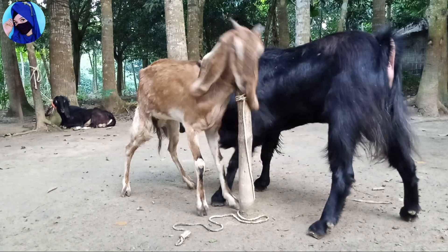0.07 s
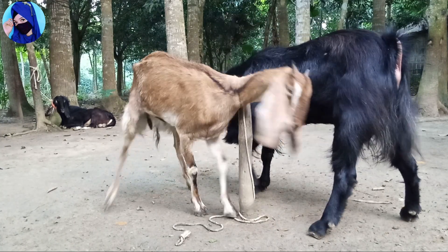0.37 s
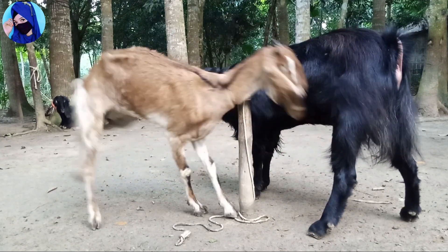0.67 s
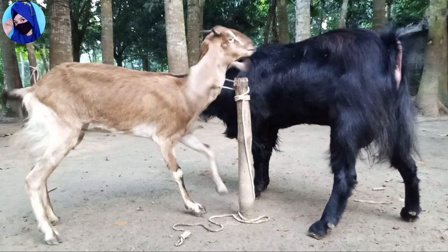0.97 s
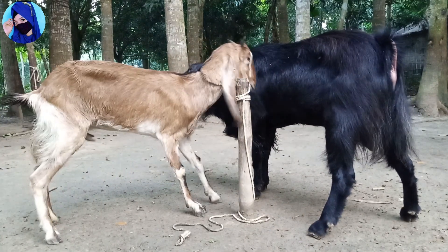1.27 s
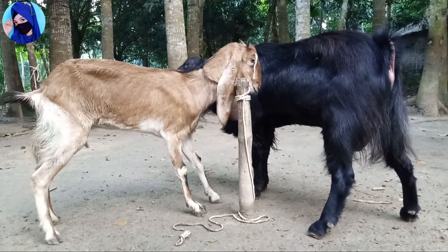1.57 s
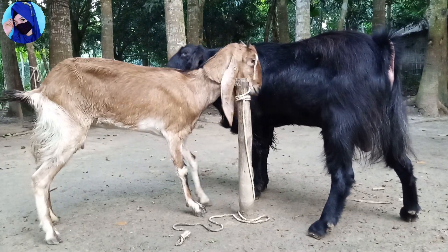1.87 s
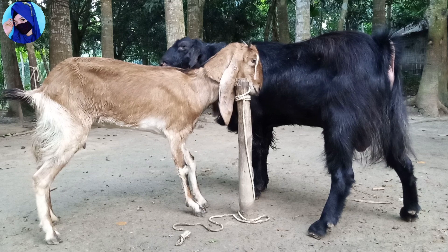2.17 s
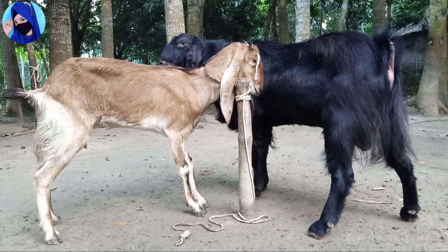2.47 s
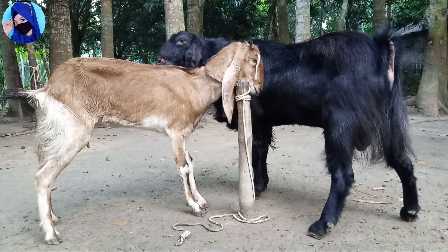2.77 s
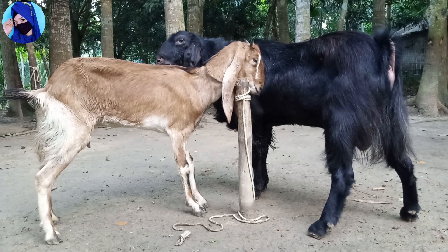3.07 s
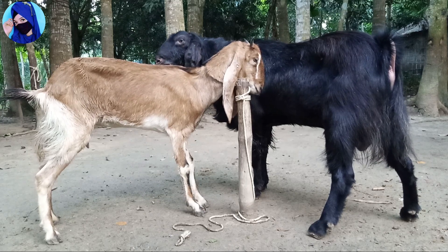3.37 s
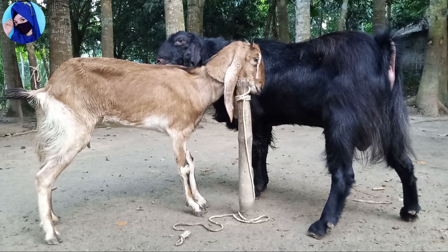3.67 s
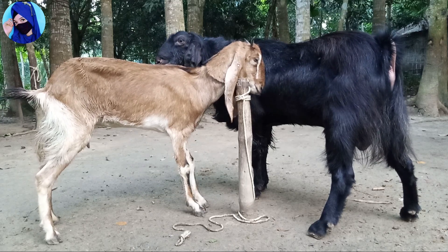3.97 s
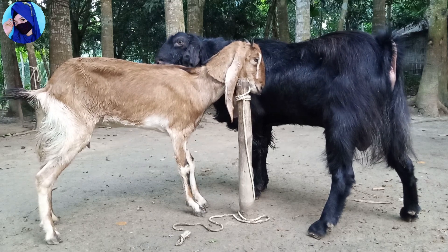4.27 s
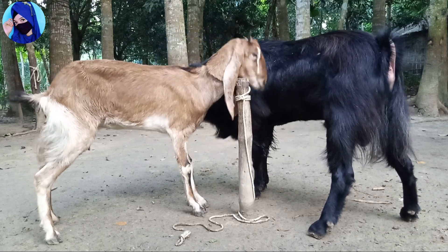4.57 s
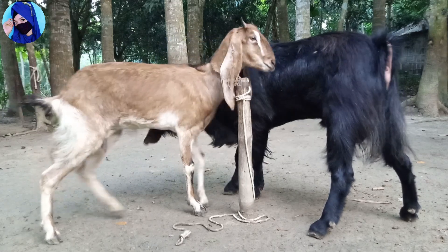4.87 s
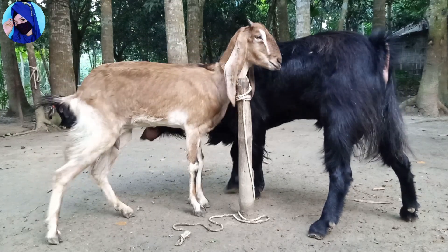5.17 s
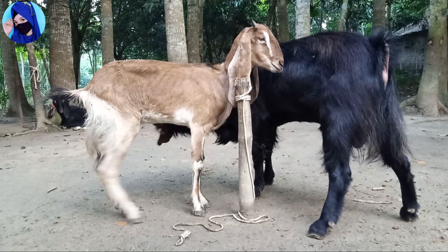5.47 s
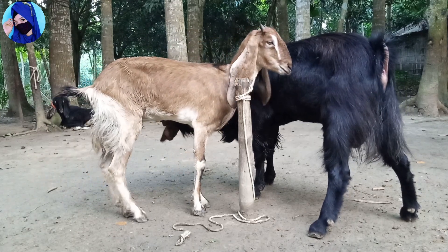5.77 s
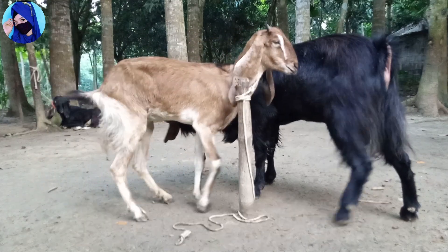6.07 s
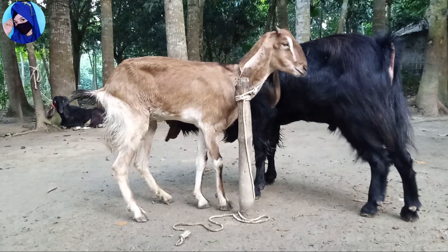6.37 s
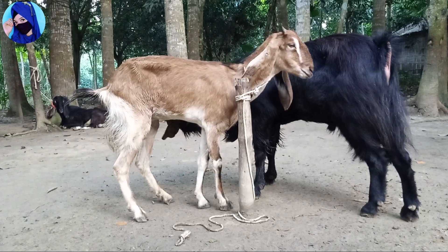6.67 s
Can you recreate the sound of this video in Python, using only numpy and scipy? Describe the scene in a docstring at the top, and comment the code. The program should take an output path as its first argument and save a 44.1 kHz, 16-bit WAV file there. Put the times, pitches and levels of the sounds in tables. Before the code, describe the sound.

Close by in a quiet outdoor yard, a goat snorts and hooves knock and scuff on packed earth. After three quick snorts and a brief closed-mouth hum, the goat stutters a bleat in five short bursts with wet lip noises, ending on a soft puff of air. Small birds whistle faintly throughout, with distant clucks, a thin insect tone, dry rustling and a low rumble.

```python
"""Two tethered goats in a yard among trees.

The buck snorts through his nostrils, hums once with closed mouth, then stutters a bleat: five short
bursts of glottal pulses through the mouth, with wet lip noises and a last puff of air. Hooves knock and
scuff on packed earth. Small birds whistle in the grove, far animals cluck and call, and insects keep up
a thin high tone over a low rumble and a dry rustle."""
import sys
import numpy as np
from scipy import signal
from scipy.fft import rfft, irfft, next_fast_len
from scipy.io import wavfile
from scipy.ndimage import uniform_filter1d, map_coordinates

SR = 44100
rng = np.random.default_rng(int(sys.argv[2]) if len(sys.argv) > 2 else 0)


def dump(signal):
    """Clip the signal to [-1, 1] and save it as 16-bit WAV at the path in sys.argv[1]."""
    limited = np.clip(np.atleast_2d(signal).T, -1, 1)
    pcm = np.round(limited * 32767).astype(np.int16)
    wavfile.write(sys.argv[1], SR, pcm)


N = 304731


def bleat(jitter=0.077, shimmer_db=5, alternate_db=4, muffle_hz=1500):
    """Hum, then five bursts: glottal pulses and air ring the vocal tract over a round chest tone."""
    # Each row: start in s, length in s, first, middle and last pitch in Hz, chest level in dB, final
    # mouth level in dB, swell in dB, attack in s, jaw and tongue resonances in Hz, roughness 0-1.
    bursts = [(3.841, 0.0737, 200, 189.5, 178, -35.5, -89, 6, 0.039, 400, 900, 0.2),
              (4.527, 0.045, 212.3, 211, 193.4, -31, -31.5, 4, 0.02, 383, 1118, 0.3),
              (4.651, 0.043, 222.2, 200.2, 213, -27.5, -25.5, -1.5, 0.007, 539, 1016, 0.72),
              (4.767, .043, 222.6, 201.8, 203.3, -27, -24, 1, 0.0053, 543, 983, 0.32),
              (4.887, .046, 205, 182.3, 232.5, -25.5, -23.5, 4.5, 0.014, 638, 927, 0.8),
              (5.003, 0.053, 204.5, 188.4, 204.3, -27.5, -19.5, 12, 0.016, 564, 916, 0.37)]
    # Upper resonances. Each row: centre in Hz, width in Hz, gain in dB.
    throat_modes = [(1426, 340, -15), (2567, 200, -23.5), (3230, 460, -17), (3550, 250, -27),
                    (5720, 150, -20.5), (6660, 380, -23.5)]
    # Nose resonance: centre in Hz, width in Hz, gain in dB.
    nasal_mode = (405, 150, -8)
    out, t = np.zeros(N), np.arange(SR // 8) / SR
    for (start_s, length_s, first_hz, middle_hz, last_hz, chest_db, mouth_db, swell_db,
         attack_s, jaw_hz, tongue_hz, rough) in bursts:
        progress = np.clip(t / length_s, 0, 1)
        pitch_hz = glide(first_hz, middle_hz, last_hz, progress)
        pitch_hz *= 1 + jitter * rough * wobble(200, size=len(t))
        phase = 2 * np.pi * np.cumsum(pitch_hz) / SR
        pulses = unit(np.cos(np.arange(1, 44)[:, None] * phase).sum(0))
        # Rough folds flap unevenly, strong and weak pulses in turn.
        pulses *= amp(rough * (shimmer_db * wobble(215, size=len(t)) + alternate_db * np.cos(phase / 2)))
        air = unit(rng.standard_normal(len(t)) * (1 + .5 * np.cos(phase)))  # one hiss per cycle
        voiced = gate(t, length_s, rise=attack_s, fall=0.0073)
        push = voiced * amp(swell_db * (progress - 1))  # the mouth opens
        vowel_modes = [nasal_mode, (jaw_hz, 230, 0), (tongue_hz, 250, 1)]
        # Nearly shut lips muffle the vowel.
        mouth = filtered((pulses + rough * air) * push,
                         lambda hz: vocal_tract(vowel_modes, hz) / (1 + (hz / muffle_hz) ** 10))
        mouth += filtered((.5 * pulses + air) * push, lambda hz: vocal_tract(throat_modes, hz))
        mouth *= np.std(push) / np.std(mouth)
        chest = voiced * unit(np.sin(phase))
        add(out, start_s, amp(mouth_db) * mouth + amp(chest_db) * chest)
    return out


def vocal_tract(modes, hz):
    """Response of steep resonances in parallel."""
    return sum(amp(db) * resonance(hz, centre_hz, width_hz) ** 2 for centre_hz, width_hz, db in modes)


def lips(rise_s=0.00095):
    """Lips and tongue part with short wet splutters."""
    # Each row: start in s, level in dB, T60 in s.
    smacks = [(4.443, -46.5, 0.06), (4.462, -41, 0.062), (4.612, -42.5, 0.031), (4.668, -40.5, 0.044),
              (4.688, -39, 0.024), (4.768, -37, 0.04), (4.803, -35, 0.02), (4.886, -39.5, 0.046),
              (4.898, -37, 0.051), (4.925, -29, 0.041), (5.050, -23.5, 0.034)]
    # Each row: frequency in Hz, level in dB.
    spectrum = [(300, -16.5), (1100, 5.5), (2100, -10.5), (3200, 2.5), (4400, -10.5), (5200, -3.5),
                (6800, -0.5), (7600, -19), (8600, -3), (12000, -16), (16000, -31)]
    out, t = np.zeros(N), np.arange(SR // 10) / SR
    for start_s, db, t60_s in smacks:
        envelope = amp(db - 60 * t / t60_s) * (1 - np.exp(-t / rise_s))
        add(out, start_s, envelope * noise(spectrum, size=len(t)))
    return out


def snorts(flutter_db=1, click_t60_s=0.017):
    """Air bursts through the nostrils with a click, holds briefly and dies away."""
    # Each row: start in s, level in dB, rise, hold and T60 in s, low cut in Hz, relative click in dB.
    blasts = [(.110, -43, 0.0023, 0.027, 0.46, 3740, 7), (0.43, -47, .01, 0.014, 0.32, 3620, -15),
              (0.454, -36.5, .005, .06, 0.44, 3760, 6.5), (1.396, -57, 0.0093, 0.079, 0.38, 8560, -20),
              (3.177, -42, 0.0027, .06, 0.6, 5840, 8), (3.246, -38.5, .004, 0.046, 0.46, 2120, 12),
              (3.317, -33.5, 0.0023, 0.033, 0.51, 2500, 7.5), (3.974, -49, 0.017, 0.066, 0.36, 5150, -14.5)]
    # Each row: frequency in Hz, level in dB.
    spectrum = [(590, -64), (1000, -6), (1190, -14), (1500, -9), (1740, -13), (2400, -4), (3760, -4.5),
                (4080, -2), (4520, -5), (5960, 1.5), (8050, -4), (9350, 0), (13500, -15), (14800, -6),
                (15700, -6)]
    out, t = np.zeros(N), np.arange(SR // 2) / SR
    for start_s, db, rise_s, hold_s, t60_s, cut_hz, click_db in blasts:
        hiss = noise(spectrum, size=len(t))
        jet = unit(filtered(hiss, lambda hz: hz ** 2 / np.hypot(hz ** 2, cut_hz ** 2)))
        decay_db = -60 * np.maximum(t - hold_s, 0) / t60_s
        flow = amp(decay_db + flutter_db * wobble(130, size=len(t))) * (1 - np.exp(-t / rise_s))
        click = amp(click_db - 60 * t / click_t60_s)
        add(out, start_s, amp(db) * jet * (flow + click))
    return out


def puff(start_s=5.27, length_s=0.13, db=-53.5):
    """The buck lets out the last of his air, dull and unvoiced."""
    # Each row: frequency in Hz, level in dB.
    spectrum = [(71, -15), (120, 0.5), (349, -15), (446, -10), (541, -28), (1200, -15.5), (2060, -22),
                (2600, -46), (3380, -71), (5720, -120)]
    out, t = np.zeros(N), np.arange(SR // 3) / SR
    add(out, start_s, amp(db) * gate(t, length_s, rise=.07, fall=0.047) * noise(spectrum, size=len(t)))
    return out


def knocks(tick_t60_s=0.017, tick_rise_s=0.001, thud_t60_s=0.034, thud_rise_s=0.00071, lag_s=0.00414):
    """Hoof blows and rope tugs: a hard tick, then a low thud of packed earth."""
    # Each row: start in s, tick level in dB, thud half-amplitude in dB, thud pitch in Hz.
    blows = [(0.06, -48, -50, 259), (0.86, -46, -43, 228), (0.9121, -25.5, -39, 302),
             (1.302, -37, -69, 330), (4.447, -46, -40, 242), (4.465, -55, -40, 179), (4.476, -60, -45, 265)]
    # Each row: frequency in Hz, level in dB.
    spectrum = [(240, -45), (400, 0), (949, -21), (1470, -3), (2830, -4), (5110, -2), (6610, -4.5),
                (7030, -7), (15000, -29.5)]
    out, t = np.zeros(N), np.arange(SR // 8) / SR
    for start_s, tick_db, thud_db, thud_hz in blows:
        tick = amp(tick_db - 60 * t / tick_t60_s) * (1 - np.exp(-t / tick_rise_s))
        thud = 2 * amp(thud_db - 60 * t / thud_t60_s) * (1 - np.exp(-t / thud_rise_s))
        add(out, start_s, tick * noise(spectrum, size=len(t)))
        add(out, start_s + lag_s, thud * np.sin(2 * np.pi * thud_hz * t))
    return out


def scuffs(fade_db=9):
    """A hoof dragged through dust bites, then fades as it slows."""
    # Each row: start in s, length in s, level at the end of the fade in dB.
    drags = [(1.036, 0.19, -55), (4.433, 0.099, -60.5), (5.848, 0.037, -55.5), (6.098, 0.21, -64.5)]
    # Each row: frequency in Hz, level in dB.
    spectrum = [(710, -59.5), (1200, -45), (1910, -23), (2130, -7), (2730, -6.5), (2930, -0.5),
                (4430, -0.5), (9570, -10.5), (14000, -49)]
    out, t = np.zeros(N), np.arange(SR // 3) / SR
    for start_s, length_s, db in drags:
        envelope = gate(t, length_s, rise=0.024, fall=0.11) * amp(db + fade_db * (1 - t / length_s))
        add(out, start_s, envelope * noise(spectrum, size=len(t)))
    return out


def birds(slur_s=.06, chirp_s=.04, chirp_hz=2634):
    """Small birds in the grove; each kind of note has its own arc and distance."""
    # Arching, then falling. Each row: start in s, length in s, level in dB, nominal pitch in Hz.
    whistles = [(.32, 0.1, -66.5, 4340), (.955, 0.1, -62.5, 4450), (1.45, .13, -60, 4310),
                (1.875, 0.12, -59.5, 4330), (2.29, .165, -59, 4417), (2.80, 0.16, -58.5, 4450),
                (3.12, .145, -55.5, 4510), (3.58, 0.17, -58, 4400), (4.32, .035, -54, 4485),
                (6.45, 0.2, -59.5, 2667)]
    # Downward, deeper in the grove. Each row: start in s, level in dB, nominal pitch in Hz.
    slurs = [(.70, -61.5, 3660), (1.321, -61, 3603), (1.821, -62.5, 4150), (2.165, -63, 3526),
             (2.688, -61, 3665), (2.94, -63, 3554), (3.778, -68, 4040), (4.337, -61.5, 3137),
             (5.251, -62, 4140), (5.379, -58, 3730), (5.55, -59, 3560), (5.871, -62.5, 3404),
             (6.041, -66, 3790), (6.71, -66, 3784)]
    # A second bird, two runs of arched notes. Each row: start in s, level in dB.
    chirps = [(.83, -57.5), (1.237, -56), (1.575, -57.5), (1.918, -58), (2.263, -60), (5.125, -58.5),
              (5.493, -56.5), (5.853, -54), (6.198, -55)]
    # Rising notes. Rows as in whistles.
    rises = [(5.605, 0.1108, -49.5, 3477), (5.625, .1, -49.5, 3984), (6.04, 0.046, -60.5, 2300),
             (6.86, 0.064, -62.5, 2640)]
    slur_notes = [(start_s, slur_s, db, hz) for start_s, db, hz in slurs]
    chirp_notes = [(start_s, chirp_s, db, chirp_hz) for start_s, db in chirps]
    return (calls(whistles, arc_semitones=(0.56, -3), echo_db=-3, waver=0.0056, blur=.05)
            + calls(slur_notes, arc_semitones=(2.52, -2.3), echo_db=7.5, waver=0.021, blur=.1)
            + calls(chirp_notes, arc_semitones=(-3, -3), echo_db=-3.5, waver=0.0068, blur=0.079)
            + calls(rises, arc_semitones=(-1.276, 0), echo_db=-2.5, waver=.012, blur=.06))


def far_animals(cluck_s=.018, first_hoot_s=.62, every_s=.665, hoot_s=0.308, hoot_db=-66.5, hoot_hz=783):
    """Fowl, low moans and three faint drooping hoots from beyond the yard."""
    # Short dropping notes. Each row: start in s, level in dB, nominal pitch in Hz.
    clucks = [(0.018, -62, 486), (.198, -52.5, 436), (.61, -54, 360), (.658, -50, 394), (.706, -49, 400),
              (.762, -53.5, 361), (2.73, -61.5, 634), (2.877, -48.5, 476), (3.915, -51, 356),
              (3.977, -56, 362), (4.026, -52, 384), (4.077, -50, 384), (4.366, -55, 428)]
    # Longer, flatter notes. Each row: start in s, length in s, level in dB, nominal pitch in Hz.
    squawks = [(0, 0.048, -57, 798), (.22, 0.04, -61.5, 647), (2.60, 0.019, -60.5, 868),
               (3.73, 0.041, -66.5, 863), (6.76, 0.062, -66, 1109)]
    # Sagging, then lifting. Rows as in squawks.
    moans = [(1.07, 0.284, -57, 312), (1.53, 0.167, -62.5, 311.5)]
    cluck_notes = [(start_s, cluck_s, db, hz) for start_s, db, hz in clucks]
    hoots = [(first_hoot_s + k * every_s, hoot_s, hoot_db, hoot_hz) for k in range(3)]
    return (calls(cluck_notes, arc_semitones=(3, -2.2), echo_db=-9, waver=.02, blur=.15, octave_db=-36.5)
            + calls(squawks, arc_semitones=(.29, -.55), echo_db=-8, waver=.022, blur=.14, octave_db=-20)
            + calls(moans, arc_semitones=(6, 2.5), echo_db=-11, waver=.032, blur=.12, octave_db=-22)
            + calls(hoots, arc_semitones=(.71, -.75), echo_db=-8.5, waver=.024, blur=.0687))


def calls(notes, arc_semitones, echo_db, waver, blur, octave_db=-45, flutter_db=3):
    """Notes on one pitch arc (start, end), heard directly and as a blurred copy the grove scatters."""
    # Each row: frequency in Hz, T60 in s.
    grove_decay = [(300, 0.55), (3500, 0.66), (8000, 0.64)]
    direct, scattered = np.zeros(N), np.zeros(N)
    first_ratio, last_ratio = 2 ** (np.array(arc_semitones) / 12)
    for start_s, length_s, db, hz in notes:
        progress = np.linspace(0, 1, int(length_s * SR))
        pitch_hz = glide(first_ratio * hz, 0.99 * hz, last_ratio * hz, progress)
        flutter = amp(flutter_db * wobble(70, size=len(progress)))
        swell = unit(np.sqrt(progress * (1 - progress)) * flutter)
        for track, spread in (direct, waver), (scattered, blur):
            detune = 1 + spread * wobble(hz / 8, size=len(progress))
            phase = 2 * np.pi * np.cumsum(pitch_hz * detune) / SR
            tone = unit(np.sin(phase) + amp(octave_db) * np.sin(2 * phase))
            add(track, start_s, amp(db) * swell * tone)
    return direct + amp(echo_db) * echo(scattered, grove_decay, build=0.004)


def bird_chorus(trim_db=-2):
    """Many distant birds merge into shifting bands of noise."""
    # Each row: time in s, level before trim in dB.
    levels = [(0, -58), (.9, -71), (1.4, -54.5), (1.75, -75), (2.3, -57.5), (3.1, -72), (3.85, -64),
              (4.2, -86.5), (4.48, -56.5), (5.4, -57.5), (5.65, -57), (6.15, -55), (6.55, -74.5),
              (6.9, -88)]
    # Each row: frequency in Hz, level in dB.
    spectrum = [(1500, -20.5), (2300, -23), (2900, -9), (3400, 4), (4400, 0.5), (5200, -5), (7000, -27.5),
                (12000, -54)]
    return amp(curves(levels)[0] + trim_db) * patchy(spectrum, depth_db=8)


def yard_stir(trim_db=7):
    """Far stir of the yard: broad, restless noise."""
    # Before and after the bleat. Each row: time in s, level before trim in dB.
    levels = [
        [(0.0, -67.5), (0.49, -71), (0.71, -65.5), (0.99, -73), (4.3, -75)],
        [(5.25, -68), (5.36, -70), (6.192, -76), (6.632, -75), (6.9, -74)],
    ]
    # Each row: frequency in Hz, level in dB.
    spectrum = [(88, -29), (150, 0.5), (346, -0.5), (633, -3.5), (1430, -12.5), (2570, -12.5),
                (2950, -16.5), (3940, -13.5), (6800, -11), (7350, -24.5), (8100, -12), (8930, -17.5),
                (10200, -6), (12000, -43), (15700, -22.5)]
    return amp(curves(np.vstack(levels))[0] + trim_db + wobble(8.6)) * patchy(spectrum, depth_db=5.5)


def leaves(trim_db=1):
    """A dry, flickering rustle."""
    # Each row: time in s, level before trim in dB.
    levels = [(0, -67), (.7, -57.5), (1.05, -77.5), (2.5, -76), (3.7, -64.5), (4.2, -69.5), (5.4, -67.5),
              (6.1, -63), (6.45, -71), (6.8, -64.5)]
    # Each row: frequency in Hz, level in dB.
    spectrum = [(900, -14), (2500, -27), (4200, 1.5), (6300, 0), (7500, -5), (10000, -2.5), (12000, -22.5),
                (16000, -19)]
    return amp(curves(levels)[0] + trim_db + wobble(25)) * patchy(spectrum, depth_db=6)


def insects(flicker_db=1.8):
    """A thin high tone of narrow noise bands."""
    # Each row: centre in Hz, width in Hz, level in dB.
    bands = [(7900, 60, -79), (8165, 45, -70.5), (8310, 140, -76), (10230, 910, -77.5)]
    out = np.zeros(N)
    for centre_hz, width_hz, db in bands:
        level = amp(db + flicker_db * wobble(23))
        tone = filtered(rng.standard_normal(N), lambda hz: resonance(hz, centre_hz, width_hz) ** 2)
        out += level * unit(tone)
    return out


def rumble(db=-66, lumps_db=3.5):
    """Low, lumpy noise."""
    # Each row: frequency in Hz, level in dB.
    spectrum = [(20, -40), (45, -14.5), (75, 2), (115, 0), (170, -10.5), (300, -30), (800, -68)]
    return amp(db + lumps_db * wobble(18)) * noise(spectrum)


def patchy(spectrum, depth_db):
    """Noise of rms 1 whose bands swell and fade on their own."""
    z = signal.stft(noise(spectrum), nperseg=1024)[2]
    field = rng.standard_normal(z.shape)
    for axis in 0, 1, 0, 1:
        field = uniform_filter1d(field, size=5, axis=axis, mode="wrap")
    return unit(signal.istft(z * amp(depth_db * np.tanh(unit(field))), nperseg=1024)[1][:N])


def glide(first_hz, middle_hz, last_hz, u):
    """A pitch arc through three points as u runs from 0 to 1."""
    return np.polyval(np.polyfit([0, .5, 1], [first_hz, middle_hz, last_hz], 2), u)


def amp(db):
    """Decibels to gain."""
    return 10 ** (np.asarray(db) / 20)


def unit(x):
    """Scale to rms 1."""
    return x / np.sqrt(np.mean(x ** 2) + 1e-20)


def along(points, hz):
    """Read (Hz, value) points on a log axis."""
    f, v = np.transpose(points)
    return np.interp(np.log(hz + 1), np.log(f), v)


def curves(rows):
    """One value per sample for each column after the time."""
    s, *cols = np.transpose(rows)
    return [np.interp(np.arange(N) / SR, s, c) for c in cols]


def wobble(rate, size=N):
    """A smooth random curve with rate knots a second."""
    return map_coordinates(rng.standard_normal(int(size * rate / SR) + 4),
                           [np.arange(size) * rate / SR], mode="nearest")


def filtered(x, response):
    """x through a frequency response."""
    m = next_fast_len(len(x) + 8192)
    return irfft(rfft(x, m) * response(np.fft.rfftfreq(m, 1 / SR)), m)[:len(x)]


def noise(spectrum, size=N):
    """Coloured noise of rms 1."""
    return unit(filtered(rng.standard_normal(size), lambda hz: amp(along(spectrum, hz))))


def resonance(hz, centre, width):
    """Response of one damped resonance."""
    return 1j * hz * width / (centre ** 2 - hz ** 2 + 1j * hz * width)


def gate(t, length, rise, fall):
    """Opens smoothly at 0 and closes around the given length."""
    return (np.sin(np.pi / 2 * np.clip(t / rise, 0, 1)) ** 2
            * np.sin(np.pi / 2 * np.clip((length - t) / fall + .5, 0, 1)) ** 2)


def add(track, s, sound):
    """Mix a sound into the track at s seconds."""
    start = max(round(s * SR), 0)
    track[start:start + len(sound)] += sound[:max(N - start, 0)]


def echo(x, t60s, build):
    """Scatter from ground and trunks: it builds up, then each frequency dies at its own speed."""
    hz, t, z = signal.stft(rng.standard_normal(SR), SR, nperseg=256)
    tail = signal.istft(z * amp(-60 * t / along(t60s, hz)[:, None]) * (1 - np.exp(-t / build)),
                        SR, nperseg=256)[1]
    return signal.fftconvolve(x, tail / np.linalg.norm(tail))[:N]


def scene():
    """Goats close by; far calls smeared by the nearest trunks; background under both."""
    # Echo around the goats. Each row: frequency in Hz, T60 in s.
    near_decay = [(150, 0.127), (500, 0.26), (950, 0.17), (3000, 0.31), (10000, 0.18)]
    # Scatter off the trunks. Each row: frequency in Hz, T60 in s.
    trunk_decay = [(400, 0.087), (4000, 0.053)]
    near = bleat() + lips() + knocks()
    far = birds() + far_animals()
    far = .85 * far + .5 * echo(far, trunk_decay, build=.002)
    near += amp(-11) * echo(near, near_decay, build=0.0071)
    goats = near + snorts() + puff() + scuffs()
    background = rumble() + yard_stir() + bird_chorus() + leaves() + insects()
    return (goats + far + background)[None]


def record(dry):
    """Brick-wall low-pass, mono."""
    top_hz = 15750
    return filtered(dry[0], lambda hz: hz < top_hz)[None]


dry = scene()
out = record(dry)
dump(out)
```